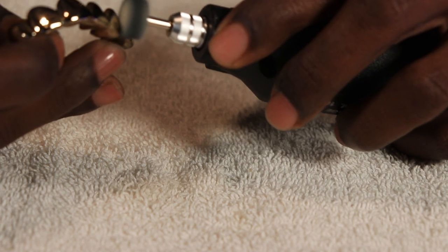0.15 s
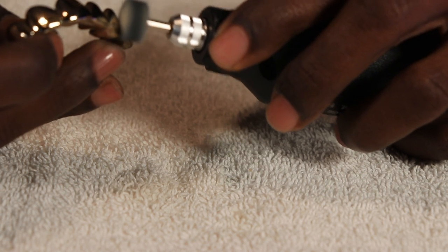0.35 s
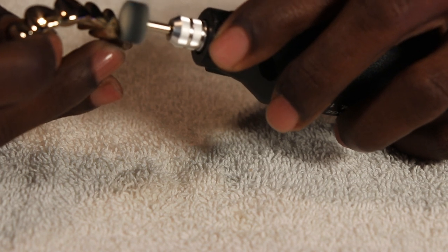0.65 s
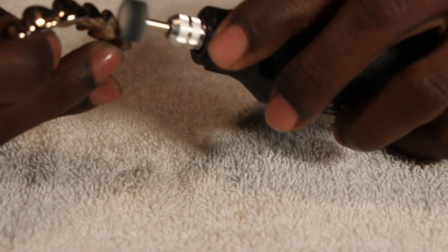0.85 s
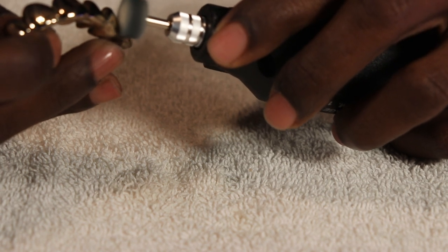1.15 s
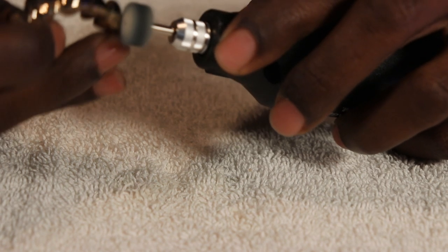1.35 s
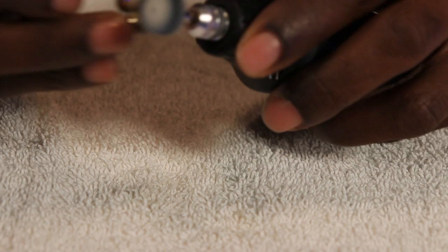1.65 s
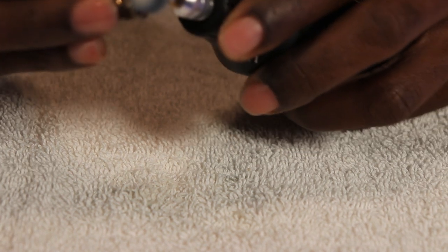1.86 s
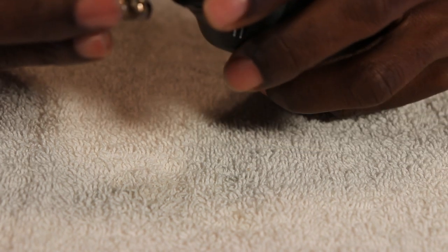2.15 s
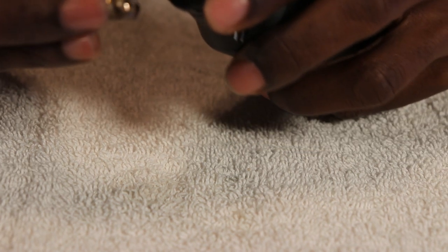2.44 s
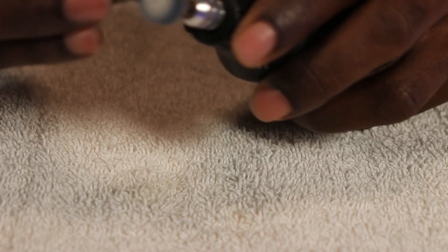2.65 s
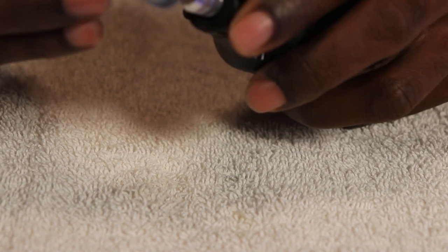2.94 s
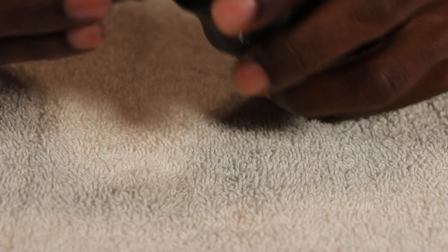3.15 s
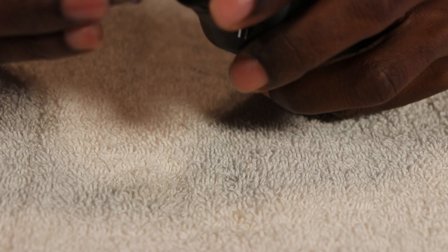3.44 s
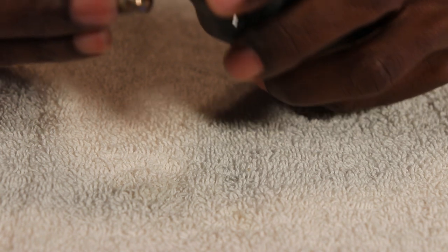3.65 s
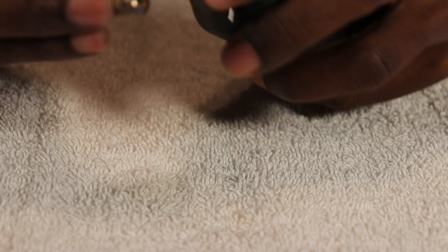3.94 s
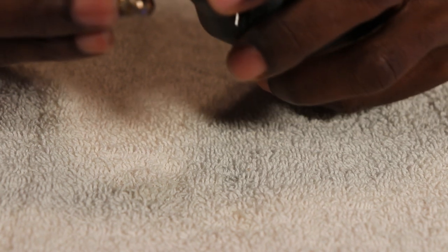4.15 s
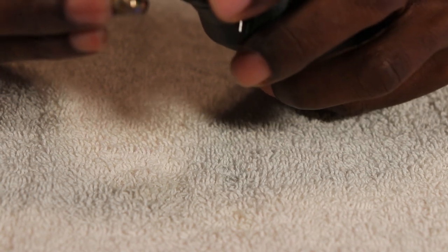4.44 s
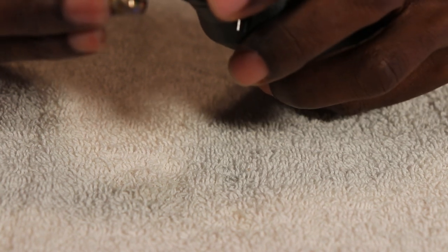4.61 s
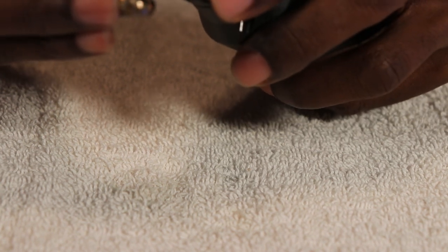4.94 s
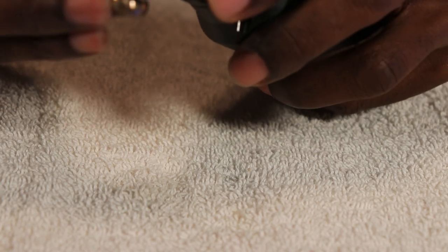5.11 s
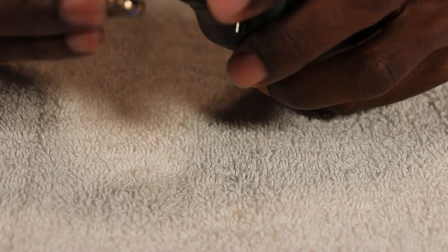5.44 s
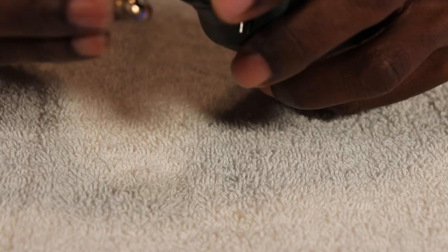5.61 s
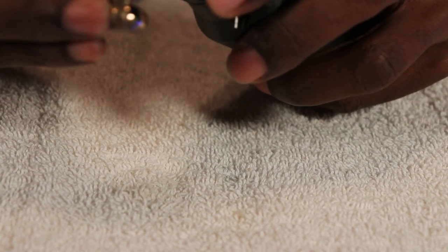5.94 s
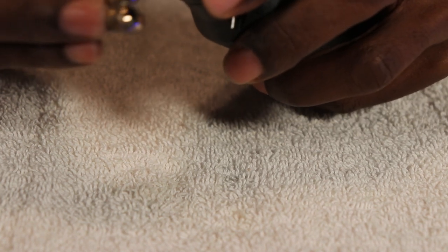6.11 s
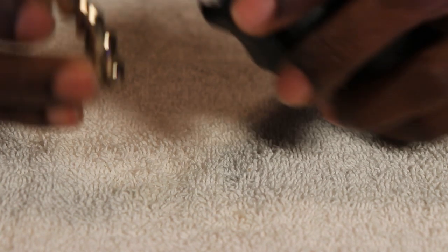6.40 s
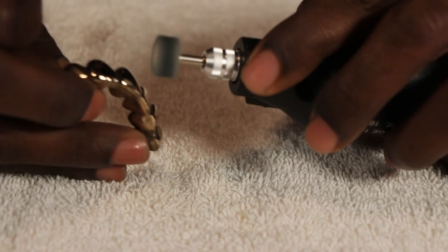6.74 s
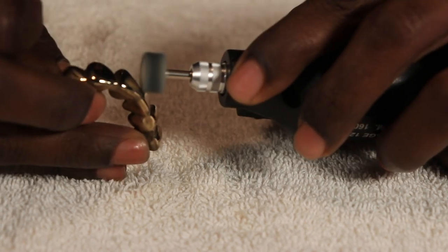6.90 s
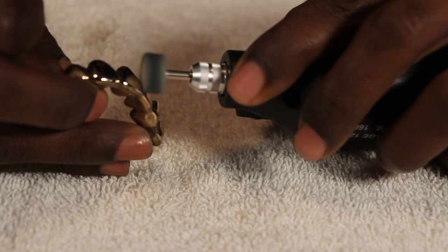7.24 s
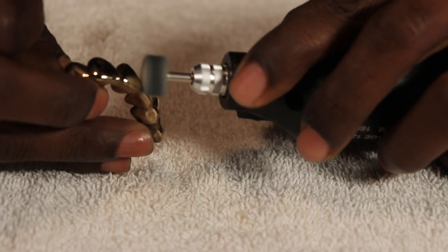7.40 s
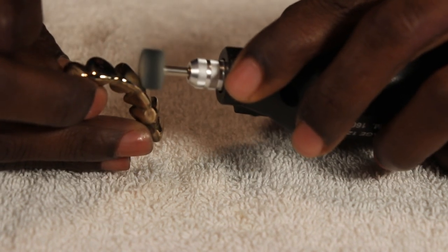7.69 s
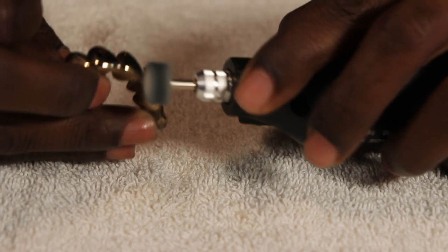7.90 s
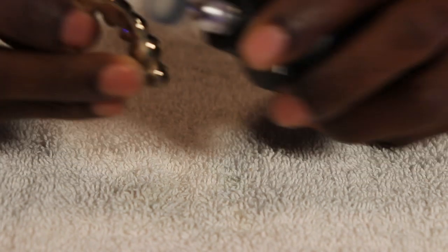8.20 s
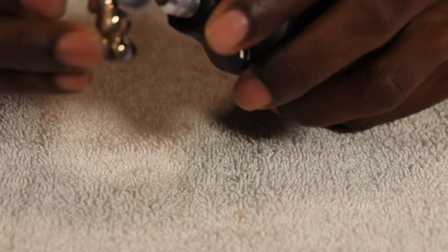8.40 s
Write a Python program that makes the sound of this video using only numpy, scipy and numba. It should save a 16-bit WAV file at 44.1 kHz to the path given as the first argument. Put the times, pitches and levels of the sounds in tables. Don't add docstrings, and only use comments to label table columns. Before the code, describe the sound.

Close stereo pickup of a handheld polishing tool in a quiet room. The steady, rough electric whine with dense high overtones dips with small pushes against a metal bracelet, turning grainier and rubbing. When released, it jumps slightly higher, flares and rattles with fast dry ticking around the chuck. The longest press sinks gradually in the middle; brightness shifts as the hands turn. Low hum lies underneath.

```python
import sys
import numpy as np
from scipy import signal
from scipy.fft import rfft, irfft
from scipy.io import wavfile
from scipy.ndimage import uniform_filter1d
from numba import njit

SR = 44100
rng = np.random.default_rng(int(sys.argv[2]) if len(sys.argv) > 2 else 0)


def digitize_waveform(pressure):
    field = np.atleast_2d(pressure).T
    bounded = np.clip(field, -1, 1)
    quanta = np.round(bounded * 32767).astype(np.int16)
    wavfile.write(sys.argv[1], SR, quanta)


def attenuation_scalar(level_db):
    decades = np.asarray(level_db, float) / 20
    return 10 ** decades


N = 377487
TIME = np.arange(N) / SR
BINS = np.arange(N // 2 + 1) * SR / N + 1
FLAT = np.zeros(len(BINS))
HOP = 256
HOP_TIME = np.arange(N // HOP + 2) * HOP / SR
FREE_HZ, LOADED_HZ = 85.2, 80
RATIO = 3
WHINE_ORDER, TOP_ORDER = 60, 186


def shape(points, hz):
    f, value = np.transpose(points)
    return np.interp(np.log(hz), np.log(f), value)


def at(points, s):
    return np.interp(s, *np.transpose(points))


def walk(rate, count):
    k = max(int(SR / HOP / rate), 1)
    x = rng.standard_normal((N // HOP + 2, count))
    x = uniform_filter1d(x, k, axis=0)
    x = uniform_filter1d(x, k, axis=0)
    return x / x.std()


# f/Hz, likeness 0-1
LIKENESS = [(60, 0.9), (300, 0.63), (700, 0.97), (1400, 0.57), (3000, 0.6), (7000, 0.72), (15000, 0)]


def noise(db_per_hz):
    like = np.clip(shape(LIKENESS, BINS), 0, 1)
    mid, side = rfft(rng.standard_normal((2, N))) * attenuation_scalar(db_per_hz) * np.sqrt(SR / 4)
    mid = mid * np.sqrt(1 + like)
    side = side * np.sqrt(1 - like)
    return irfft(np.array([mid + side, mid - side]), N)


# start t/s, end t/s, speed lost at first f/Hz, speed lost at last f/Hz
CONTACTS = [
    (-0.32, 1.51, 5.87, 4.37),
    (1.99, 2.68, 4.58, 3.54),
    (3.17, 6.34, 1.88, 7.92),
    (7.09, 8.02, 1.75, 5.7),
]
TOUCH_S, LIFT_S = 0.0593, 0.0408
# t/s, speed lost f/Hz, spread t/s
STROKES = [(0.031, 2.3, 0.038), (0.245, 1.6, 0.04), (0.452, 2.4, 0.04), (0.68, 2.5, 0.058),
           (0.84, 2.3, 0.048), (0.939, 6.8, 0.042), (1.126, 3.3, 0.066), (1.313, 2.3, 0.044),
           (1.85, 0.1, 0.16), (2.35, 1.1, 0.1), (2.394, -3.6, 0.044), (2.571, 1.5, 0.026),
           (3.314, 3.1, 0.071), (3.547, 3.4, 0.059), (3.73, 1.0, 0.02), (3.823, 2.3, 0.085),
           (4.065, 4.6, 0.062), (4.293, 3.4, 0.061), (4.479, 2.3, 0.048), (4.63, 1.7, 0.115),
           (4.962, 1.5, 0.101), (5.2, 0.9, 0.16), (5.506, 1.5, 0.137), (5.699, -1.0, 0.089),
           (5.924, 0.7, 0.023), (6.226, 1.9, 0.028), (7.19, 1.6, 0.047), (7.44, 2.1, 0.036),
           (7.684, 3.7, 0.04), (7.894, 1.8, 0.043)]


def speed():
    lost = 0
    for start, end, first, last in CONTACTS:
        sag = first + (last - first) * (TIME - start) / (end - start)
        touch = 1 + np.tanh((TIME - start) / TOUCH_S)
        lift = 1 + np.tanh((end - TIME) / LIFT_S)
        lost = lost + sag * touch * lift / 4
    for s, hz, spread in STROKES:
        lost = lost + hz * np.exp(-.5 * ((TIME - s) / spread) ** 2)
    return np.minimum(FREE_HZ - lost, FREE_HZ)


def load_of(hz):
    return np.clip((FREE_HZ - hz) / (FREE_HZ - LOADED_HZ), 0, 1)


def spin_up(s):
    flare_s = 0.054
    return sum(np.exp(-np.abs(s - end - LIFT_S) / flare_s) for _, end, *_ in CONTACTS)


# t/s, aim 0-1
AIM = [(0, 0.7), (.9, 0.66), (1.2, 0.65), (1.52, 0.8), (1.62, 0.3), (2.2, 0.43), (2.9, .25), (3.6, 0.35),
       (3.85, 0.56), (4.8, 0.03), (5.6, 0.26), (6.1, 0.34), (6.44, 0.35), (6.68, .8), (7.2, 0.96),
       (7.9, 1.03), (8.2, 0.54), (8.32, 0.37)]


def aim_at(s):
    return at(AIM, s)


# f/Hz, level/dB per Hz
HISS = [(300, -104), (600, -100), (1250, -90.5), (1900, -89.5), (2450, -77.5), (2900, -89), (3500, -86.5),
        (4000, -82.5), (4500, -92), (6200, -91.5), (7600, -89.5), (11000, -93), (13000, -94.5),
        (15500, -100)]
# f/Hz, width f/Hz, level/dB
CASING = [(1920, 105, -2.5), (2800, 450, -1), (3090, 210, 3), (4570, 200, 4), (3300, 200, -4),
          (5360, 190, 4), (6410, 450, -6.5), (9700, 550, 1.5), (11140, 2600, -2), (13300, 450, 2),
          (13000, 530, 1)]


def casing(hz):
    db = shape(HISS, hz)
    for f, width, mode_db in CASING:
        db = db + mode_db / (1 + (2 * (hz - f) / width) ** 2)
    return db


def whine_db(s, load, aimed):
    free = -60 + 18 * aimed
    loaded = -55.5 - 5.5 * aimed
    return free + (loaded - free) * load + 2.5 * spin_up(s) * aimed


@njit
def stack(turns, size, hop):
    out = np.zeros((2, len(turns)))
    for i in range(len(turns)):
        z = np.exp(2j * np.pi * turns[i])
        w = 1. + 0j
        b, f = i // hop, (i % hop) / hop
        for k in range(size.shape[2]):
            w *= z
            for c in range(2):
                a = size[c, b, k] + f * (size[c, b + 1, k] - size[c, b, k])
                out[c, i] += a.real * w.real - a.imag * w.imag
    return out


# order of the shaft, level/dB running free, level/dB under load
GEARS = [(3, -70, -71.5), (6, -73, -76.5), (7, -76, -99), (8, -81, -64.5), (9, -68, -61), (10, -73.8, -79),
         (11, -52, -52.5), (12, -97, -66.5), (14, -56, -62.7), (15, -54.5, -59), (16, -68, -70.5),
         (17, -69.5, -58), (18, -58, -60), (19, -70, -65), (20, -65, -65), (21, -61, -66), (22, -52, -60.5),
         (23, -63, -66), (24, -84, -67.5), (25, -54.5, -65.5), (26, -52, -54.5), (27, -58.5, -58.5),
         (28, -53, -60.5), (29, -57.5, -57.5), (30, -52, -58.5), (31, -83, -54.5), (32, -66, -60.5),
         (33, -57.5, -53)]
SINGS = {"free, turned away": [(12, -76), (21, -66), (22, -56), (16, -66), (17, -58), (35, -57),
         (41, -58.5), (45, -60), (46, -57), (47, -59), (48, -53), (57, -65), (63, -60.5), (150, -67),
         (180, -68)], "free, aimed": [(8, -72), (9, -63.5), (12, -78), (18, -56), (21, -65), (25, -54),
         (41, -56.5), (44, -65), (45, -53), (46, -55.5), (93, -61), (117, -58.5), (150, -66), (156, -67),
         (159, -70), (180, -67.8)], "pressed, turned away": [(6, -69), (20, -68.5), (21, -68), (25, -74),
         (26, -66.5), (39, -53), (48, -58.5), (123, -74), (156, -66), (165, -65.5), (168, -63.5),
         (171, -68)], "pressed, aimed": [(22, -55.5), (25, -57.5), (33, -50.5), (34, -57), (45, -55.5),
         (63, -64), (66, -57), (90, -61), (93, -59), (96, -61.5), (105, -53), (108, -59), (126, -59)]}
# order, level/dB
BRUSHING = [(37, -60.5), (48, -52.5), (49, -61), (63, -55.5), (66, -57.5), (105, -58.5), (156, -67),
            (159, -73)]


def orders(hz, turns):
    hz = np.interp(HOP_TIME, TIME, hz)[:, None]
    load = load_of(hz)
    k = np.arange(1, TOP_ORDER)
    motor = k % RATIO == 0
    rise_db = np.where(motor, 7.2 - 0.016 * k - 0.37 * load, 7.5 - .11 * k - 0.63 * load)
    db = casing(k * hz) + 10 * np.log10(hz) + rise_db + 0.71 * rng.standard_normal(len(k))
    last_gear = GEARS[-1][0]
    db[:, :last_gear] = -110
    for order, free_db, load_db in GEARS:
        db[:, order - 1] = free_db + (load_db - free_db) * load[:, 0]

    loose = np.clip(k / 25., .55, 1)
    wander = np.where(motor & (k > last_gear), .27 + k / 800, .6)
    db += 2.2 * wander * loose * walk(3.5, count=len(k))
    aim = aim_at(HOP_TIME)
    db[:, WHINE_ORDER - 1] = whine_db(HOP_TIME, load[:, 0], np.clip(aim, 0, 1))

    pressed = np.clip(2.5 * load[:, 0] - .6, 0, 1)
    aimed = np.clip(4 * aim - 1.8, 0, 1)
    holds = [(1 - pressed) * (1 - aimed), (1 - pressed) * aimed, pressed * (1 - aimed), pressed * aimed]
    plain = db.copy()
    for hold, lines in zip(holds, SINGS.values()):
        for order, sing_db in lines:
            db[:, order - 1] += hold * (sing_db - plain[:, order - 1])
    brushing = np.exp(-(hz[:, 0] - 81.74) ** 4)
    for order, sing_db in BRUSHING:
        db[:, order - 1] += brushing * (sing_db - db[:, order - 1])

    db += 0.5 * np.maximum(78.76 - hz, 0) * (k > WHINE_ORDER)
    db += (1.3 + 2.7 * load) * wander * np.clip(k / 30., .4, 1) * walk(32., count=len(k))
    db[k * hz > 15800] = -140
    phase = rng.uniform(0, 2 * np.pi, len(k)) + .45 * np.sqrt(wander) * loose * walk(12., count=len(k))

    apart = np.sqrt(1 - np.clip(shape(LIKENESS, k * FREE_HZ), 0, 1))
    lag = 1.1 * apart * walk(1.5, count=len(k))
    tilt_db = 1.5 * apart * walk(1.5, count=len(k))
    size = [np.sqrt(2) * attenuation_scalar(db + e * tilt_db) * np.exp(1j * (phase + e * lag / 2)) for e in (1, -1)]
    return stack(turns, np.array(size), HOP)


# f/Hz, level/dB per Hz
FELT = [(420, -112), (650, -99), (1500, -100), (2000, -87.5), (2600, -95), (3200, -98.5), (4100, -95.5),
        (5500, -89), (7000, -104)]


def hiss(hz, turns):
    beat = 1 + .4 * np.cos(2 * np.pi * RATIO * turns) + .45 * np.cos(2 * np.pi * turns)
    brush = irfft(rfft(noise(FLAT) * beat) * attenuation_scalar(casing(BINS) - 1.2), N)
    rub = beat * load_of(hz) * attenuation_scalar(3 * aim_at(TIME))
    felt = irfft(rfft(noise(FLAT) * rub) * attenuation_scalar(shape(FELT, BINS)), N)
    return brush + felt


PANEL_EDGES_HZ = (1950, 2760, 6300)
PANELS = [
    (1.5, 0, 1.5, 0.5),
    (8, 1.8, 1.5, 0.2),
    (-1, -1.3, 2, .5),
    (-1.6, -3.2, 1.5, 0),
]


def hands(tool, load):
    below = [0] + [1 / (1 + (BINS / f) ** 16) for f in PANEL_EDGES_HZ] + [1]
    flutter = walk(30., count=len(PANELS))
    drift = walk(3.4, count=len(PANELS))
    out, spectrum = 0, rfft(tool)
    for j, (aim_db, load_db, surge_db, drift_db) in enumerate(PANELS):
        db = aim_db * aim_at(TIME) + load_db * load + surge_db * spin_up(TIME)
        wander_db = flutter[:, j] + drift_db * drift[:, j]
        db = db - db.mean() + np.interp(TIME, HOP_TIME, wander_db)
        band = irfft(spectrum * (below[j + 1] - below[j]), N)
        out = out + attenuation_scalar(db) * band
    return out


# f/Hz, level/dB per Hz
ROOM = [(20, -113), (45, -99), (80, -92), (130, -91), (200, -93), (320, -99), (500, -102), (2000, -112)]
# t/s, level/dB
HUM = [(0, -66), (4, -65), (6.2, -69), (6.8, -73), (8.56, -67.5)]
# t/s, level/dB above the room tone
TRAFFIC = [(0, 1.5), (.8, 1), (1.5, 0.5), (4, -1), (8.56, -5.5)]
# f/Hz, level/dB
DRONE = [(88, -74.5), (134, -84), (280, -77)]


def room():
    throb = 1 + .6 * np.cos(2 * np.pi * (3.07 * TIME + .13 * TIME ** 2 - .78))
    hum = attenuation_scalar(at(HUM, TIME)) * 1.04 * throb * np.sin(2 * np.pi * 72.5 * TIME)
    mains = np.sqrt(2) * attenuation_scalar(-78.5) * np.sin(2 * np.pi * 118.5 * TIME)
    drone = sum(np.sqrt(2) * attenuation_scalar(db) * np.sin(2 * np.pi * hz * TIME) for hz, db in DRONE)
    passing = np.clip((1.7 - TIME) / .5, 0, 1)
    tone = noise(shape(ROOM, BINS)) * attenuation_scalar(at(TRAFFIC, TIME))
    return tone + drone * passing + hum + mains


# start t/s, end t/s, level/dB of the band it fills
RATTLE = [(1.44, 2.013, -48), (2.047, 2.123, -47.5), (2.2, 2.303, -47), (2.342, 2.617, -50.5),
          (2.665, 3.147, -48.5), (3.22, 3.27, -50), (3.398, 3.47, -47), (3.6, 3.72, -51.5),
          (3.807, 3.873, -47.5), (6.31, 6.557, -46), (6.547, 6.8, -51.5), (8.1, 8.3, -48),
          (8.357, 8.6, -47.5)]


def rattle(turns):
    centre_hz, width_hz = 7750, 2070
    idle_db, floor_db, ease_s = -53.5, -54.5, 0.047
    shaft_tick = np.where(RATIO * turns < 1, attenuation_scalar(4), 1)
    tick = np.exp(-(RATIO * turns % 1) / 0.12) * shaft_tick
    uneven = attenuation_scalar(1.1 * uniform_filter1d(rng.standard_normal(N), 150) * np.sqrt(150))
    ring = 1 / (1 + ((BINS - centre_hz) / (width_hz / 2)) ** 4)
    x = irfft(rfft(noise(FLAT) * tick * uneven) * ring, N)
    power = 0
    for start, end, db in RATTLE:
        inside_s = np.minimum(TIME - start, end - TIME)
        power = power + attenuation_scalar(2 * db) * np.clip(inside_s / ease_s + .5, 0, 1)
    excess = np.maximum(power, attenuation_scalar(2 * idle_db)) - attenuation_scalar(2 * floor_db)
    return x / x.std() * np.sqrt(np.maximum(excess, 0))


def scene():
    hz = speed()
    turns = np.cumsum(hz) / SR % 1
    tool = orders(hz, turns) + hiss(hz, turns)
    return hands(tool, load_of(hz)) + rattle(turns) + room()


def low_pass(x):
    return signal.sosfilt(signal.butter(12, 15780, fs=SR, output="sos"), x)


# f/Hz, left minus right level/dB
BALANCE_DB = [(60, 2.5), (200, -0.5), (700, -1.5), (1300, -1.5), (2400, -5.5), (3300, 0.5), (4400, -3),
              (6000, -5.5), (8500, 0.5), (10500, -2), (12500, -14), (15000, -13)]


def record(dry):
    lean = shape(BALANCE_DB, BINS) / 2
    mix = irfft(rfft(dry) * attenuation_scalar(np.array([lean, -lean])), N)
    return low_pass(mix)


dry = scene()
out = record(dry)
digitize_waveform(out)
```